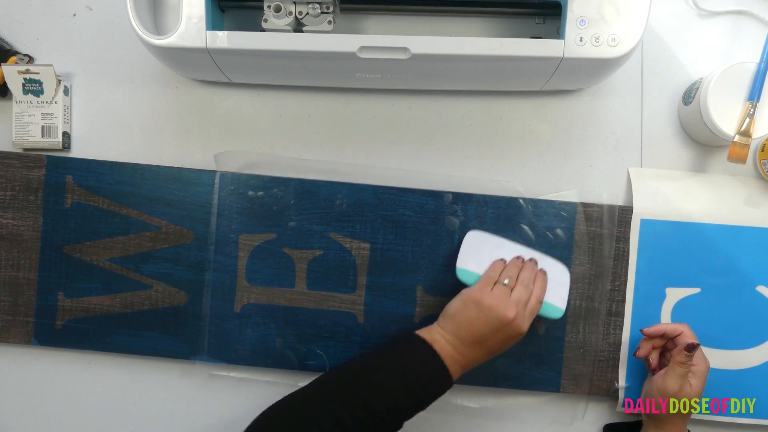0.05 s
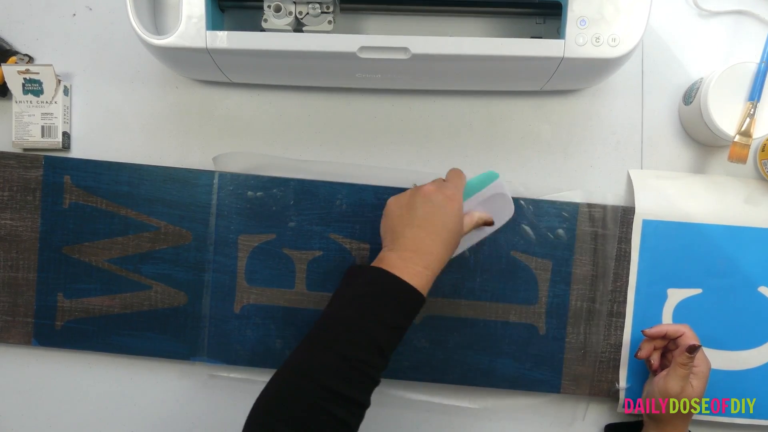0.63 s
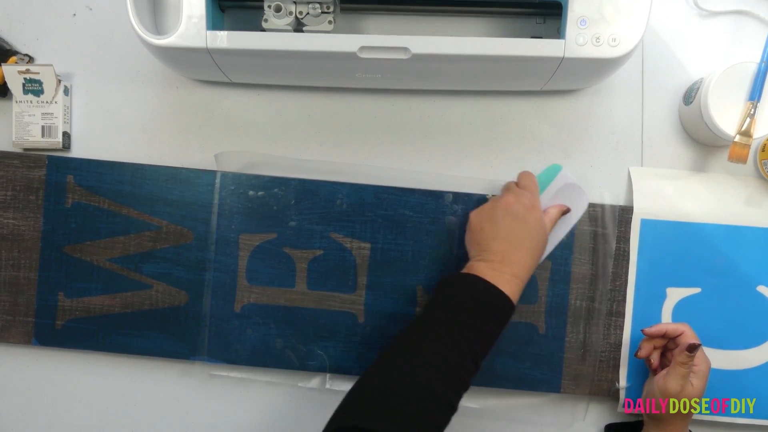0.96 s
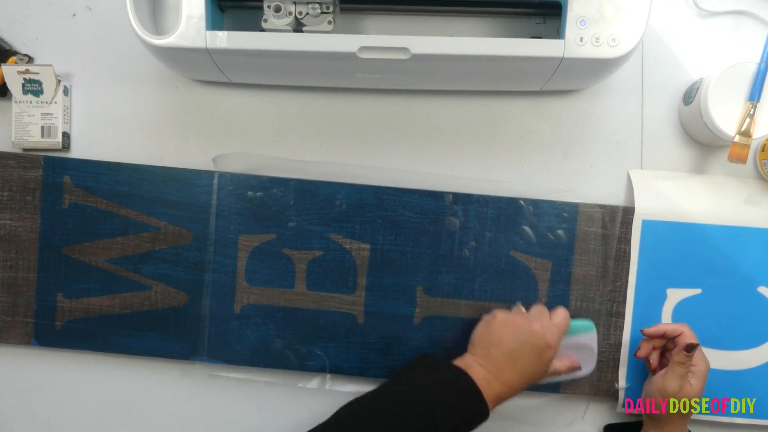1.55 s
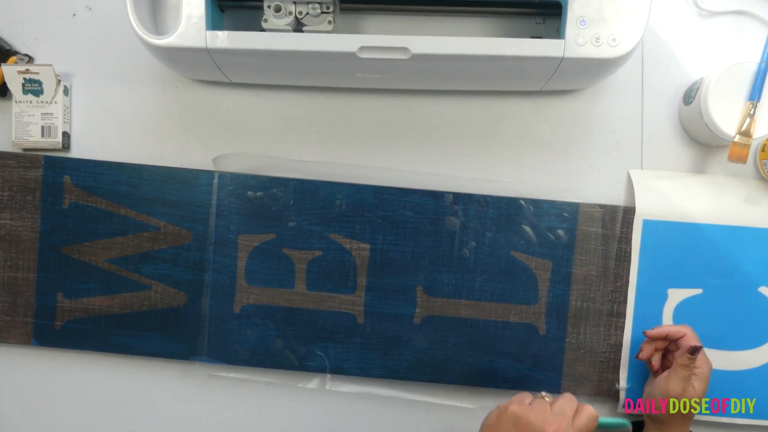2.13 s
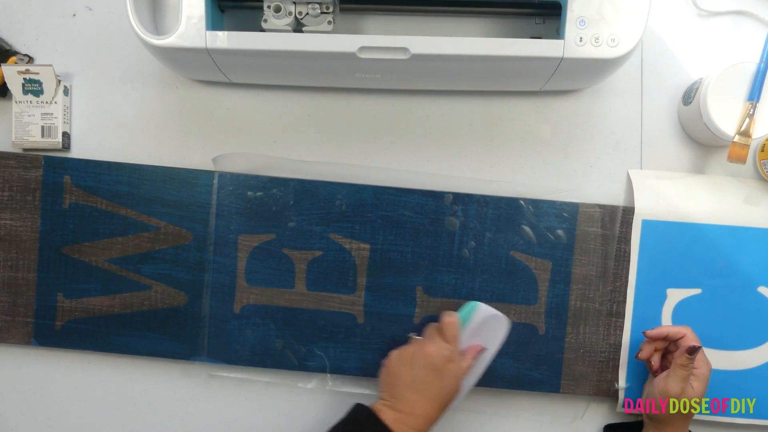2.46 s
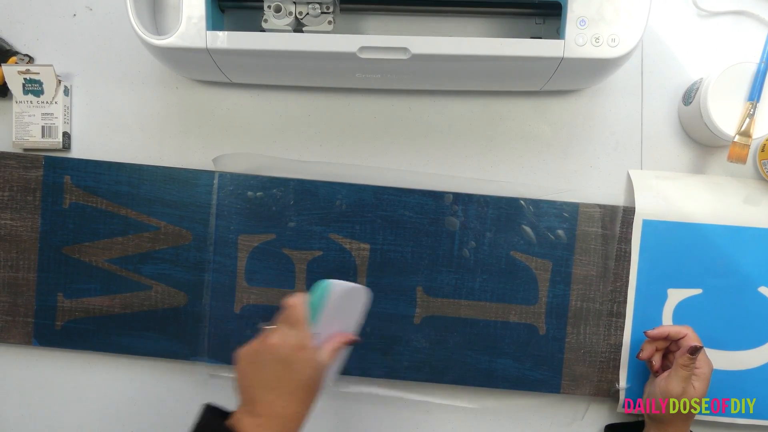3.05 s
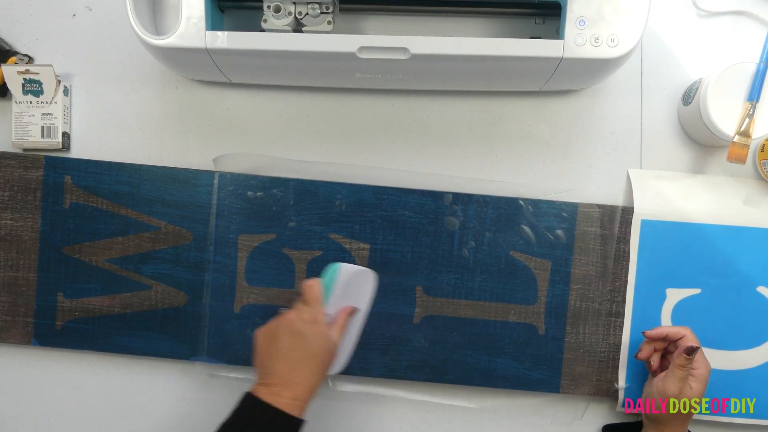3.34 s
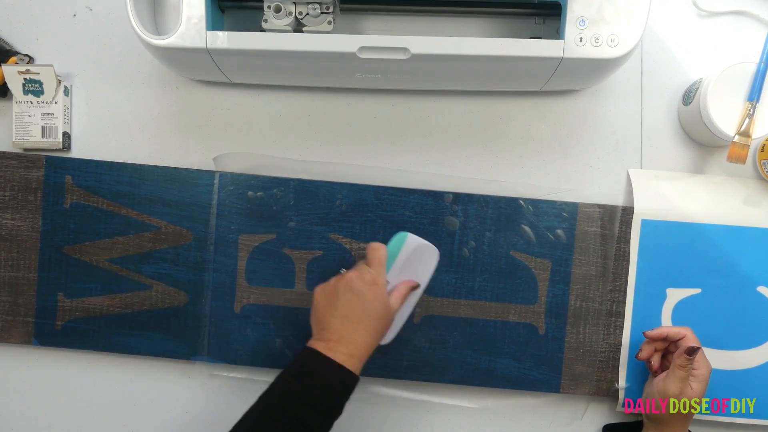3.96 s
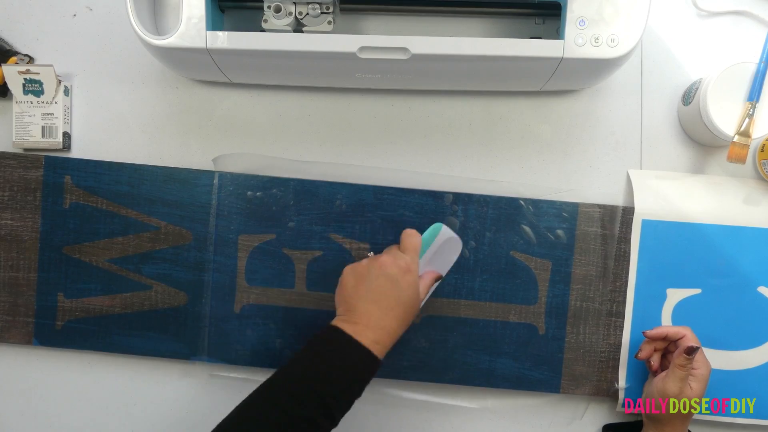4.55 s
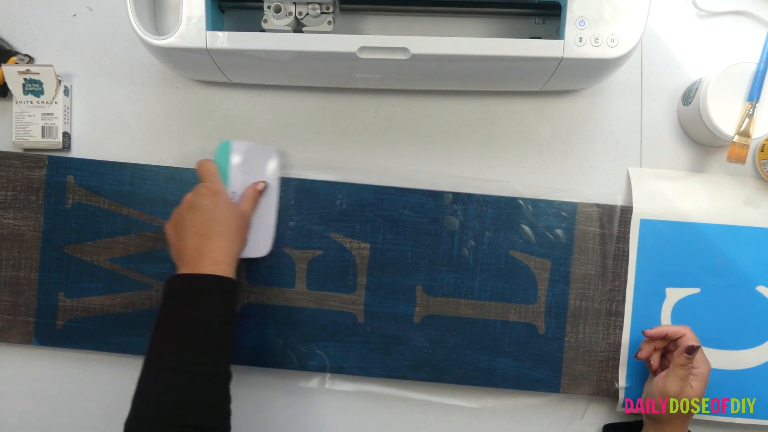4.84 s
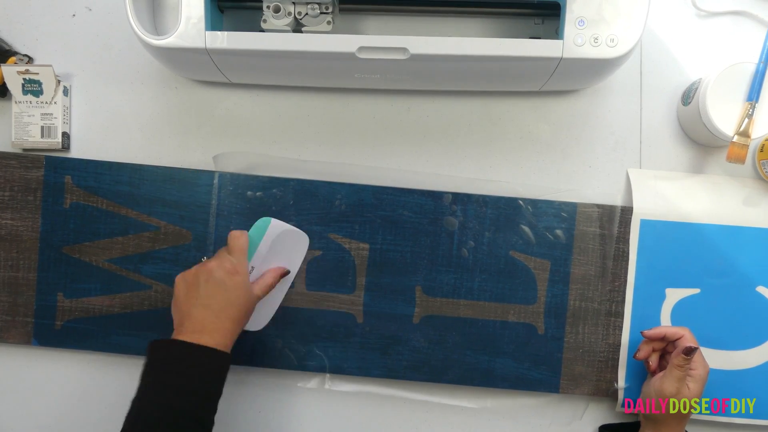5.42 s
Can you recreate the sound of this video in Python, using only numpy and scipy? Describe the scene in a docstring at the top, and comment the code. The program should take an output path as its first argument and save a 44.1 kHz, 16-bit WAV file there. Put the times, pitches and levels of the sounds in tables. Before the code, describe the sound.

Repeated close scraping of a plastic blade over a paper-covered wooden board, with sharp clacks, snags and soft thumps.

```python
"""A plastic scraper burnishes transfer paper onto a wooden board, in nine strokes of one or two pushes.
Each stroke opens with a clack as the blade lands, then swells into a rasp of tiny slips that rings
the blade and rumbles in the board. The edge snags on ridges in the vinyl; the board creaks, and rocks
with soft thumps. Heard close to the craft table in a small room, on a nearly mono stereo microphone."""
import sys
import numpy as np
from scipy import signal
from scipy.fft import rfft, irfft, next_fast_len
from scipy.io import wavfile

SR = 44100
rng = np.random.default_rng(int(sys.argv[2]) if len(sys.argv) > 2 else 0)


def master_out(mix):
    """Clip the mix to full scale and print it as 16-bit PCM to the path in sys.argv[1]."""
    frames = np.transpose(np.atleast_2d(mix))
    ceiling = np.clip(frames, -1, 1)
    pcm = np.round(ceiling * 32767).astype(np.int16)
    wavfile.write(sys.argv[1], SR, pcm)


N = 250929
TIME = np.arange(N) / SR


def from_db(db):
    """Decibels to gain."""
    return 10 ** (np.asarray(db) / 20)


def rms_one(x):
    """Scale to unit power."""
    return x / np.sqrt(np.mean(x ** 2) + 1e-20)


def colour(x, spectrum):
    """Shape a steady signal to (Hz, dB) points, rolling off beyond both ends; unit power."""
    hz, db = np.transpose(spectrum)
    size = next_fast_len(N)
    bins = np.fft.rfftfreq(size, 1 / SR) + 1
    skirts = 1 / (1 + (hz[0] / bins / 2) ** 2) / (1 + (bins / hz[-1] / 2) ** 2)
    gain = skirts * from_db(np.interp(np.log(bins), np.log(hz), db))
    return rms_one(irfft(rfft(x, size) * gain, size)[:N])


def drift(turns_per_s):
    """A random wander of unit power."""
    return rms_one(np.interp(TIME * turns_per_s, np.arange(N // 10), rng.standard_normal(N // 10)))


def decay(start, t60):
    """An envelope that jumps to 1, then falls 60 dB in t60 seconds."""
    age = TIME - start
    return (age >= 0) * from_db(-60 * np.clip(age / t60, 0, 4))


def ring(start, hz, t60):
    """A struck mode: a dying sine."""
    out, first = np.zeros(N), int(start * SR)
    age = TIME[:min(int(2 * t60 * SR), N - first)]
    out[first:first + len(age)] = -np.sin(2 * np.pi * hz * age) * np.exp(-np.log(1000) * age / t60)
    return out


# The quiet of the room around the table. Each row: frequency in Hz, relative level in dB.
AIR_SPECTRUM = [(15, -15), (25, 3), (102, 1), (277, -8.5), (560, -11), (840, -12.5), (1160, -11.5),
                (1940, -15), (2550, -18), (2760, -19), (4250, -21.5), (5000, -23), (14400, -32),
                (16000, -34)]

def room_tone(level_db=-49):
    """Faint, steady air, strongest in the bass."""
    return from_db(level_db) * colour(rng.standard_normal(N), AIR_SPECTRUM)


# The board rocking on the table. Each row: start in seconds, level in dB, middle pitch in Hz,
# length in seconds.
BOARD_THUMPS = [(0.036,-31.5,87,0.063), (0.375,-22,146,0.049), (0.654,-30,84,0.055), (0.938,-30,140,0.042),
                (1.257,-31,81,0.059), (1.846,-31,88,0.049), (2.055,-26.5,203,0.036), (3.598,-36,68.6,0.046),
                (4.644,-27,212,0.035)]

def thumps(rise=0.23):
    """Soft, low knocks whose pitch rises as the board is pressed down."""
    out = np.zeros(N)
    for start, db, hz, length in BOARD_THUMPS:
        progress = np.clip((TIME - start) / length, 0, 1)
        cycles = hz * length * progress * (1 + rise * (progress - 1))
        swell = np.sin(np.pi * progress ** 0.93) ** 2
        out += from_db(db) * swell * np.sin(2 * np.pi * cycles)
    return out


# The blade coming down on the board. Each row: start in seconds, blade ring in dB, its pitch in Hz,
# hollow ring in dB, its pitch in Hz, crack in dB, clatter in dB, its t60 in seconds, board in dB.
BLADE_LANDINGS = [(0.1386, 2.5, 1420, -45, 3440, -11.5, -29, 0.22, -41),
                  (0.7435, -19, 1430, -24.5, 900, -37, -30.5, 0.17, -45.5),
                  (1.3687, -3.5, 1624, -16, 1960, -16, -18, 0.1, -38),
                  (2.0467, -27, 1670, -18.5, 2215, -14, -21.5, 0.21, -37.5),
                  (2.6750, -13, 1130, -25, 3430, -15.5, -27, 0.29, -41.5),
                  (3.1750, -16, 1830, -22.5, 2210, -28, -27, 0.13, -49.5),
                  (3.7046, -32, 1480, -45, 736, -35, -23.5, 0.25, -37.5),
                  (4.6167, -9.5, 1260, -12, 1620, -14, -17, 0.14, -34.5),
                  (5.3308, -31, 1830, -33, 688, -20.5, -22, 0.15, -39)]
# The crack and the clatter of plastic on wood. Each row: frequency in Hz, relative level in dB.
CRACK_SPECTRUM = [(300, -43), (1000, 1), (3300, 17.5), (6000, -4), (9500, 3), (15000, -36)]
CLATTER_SPECTRUM = [(100, -19), (300, -38), (500, -30), (750, -14), (1300, 6.5), (1900, 8), (2200, 0.5),
                    (3500, -1), (5500, -3), (6500, -9), (9500, -14.5), (15000, -42)]
# The wooden board's modes. Each row: frequency in Hz, relative level in dB, t60 in seconds.
WOOD_MODES = [(124.1, 0, 0.52), (160, -8, 0.42), (216.3, -3, 0.75), (250, -9.5, 0.073), (311.3, 1.5, 0.2),
              (414, -30, 0.15), (622, 7.5, 0.052), (725, 12, 0.072), (823, 10, 0.085), (1018, 6, 0.18),
              (1240, 8, 0.02), (1554, 9, 0.24), (1825, 19.5, 0.052), (2860, 9, 0.046), (3720, 8, 0.056)]

def landings(blade_t60=0.013, hollow_t60=0.064, crack_t60=0.019):
    """The hand-damped hollow scraper cracks down, rings and clatters; the board's modes ring on."""
    crack = colour(rng.standard_normal(N), CRACK_SPECTRUM)
    clatter = colour(rng.standard_normal(N), CLATTER_SPECTRUM)
    out = np.zeros(N)
    for (start, blade_db, blade_hz, hollow_db, hollow_hz,
         crack_db, clatter_db, clatter_t60, board_db) in BLADE_LANDINGS:
        out += from_db(blade_db) * ring(start, blade_hz, blade_t60)
        out += from_db(hollow_db) * ring(start, hollow_hz, hollow_t60)
        out += from_db(crack_db) * decay(start, crack_t60) * crack
        out += from_db(clatter_db) * decay(start, clatter_t60) * clatter
        for hz, db, t60 in WOOD_MODES:   # each landing place favours other modes
            gain = from_db(board_db + db + rng.normal(0, 1.7)) * rng.choice([-1, 1])
            out += gain * ring(start, hz, t60)
    return out


def shudders(rumble, relative_db=-1, t60=0.59):
    """The board rumbles on under each landing."""
    return rumble * sum(from_db(board_db + relative_db) * decay(start, t60)
                        for start, *_, board_db in BLADE_LANDINGS)


# The scraper's pushes across the paper. Each row: start and length in seconds; rasp, paper hiss,
# board ring and rumble in dB; point of hardest press (0-1 of the push); blade ring in dB, point where
# it bites best (0-1), ring lost a whole push away from there in dB; light drag afterwards in dB;
# blade pitch at the start and at the end in Hz.
PUSHES = [ (0.167, 0.28, -29, -39.5, -46.5, -39.5, 0.66, -23.5, 0.47, 104, -42, 1185, 1290),
          (0.776, 0.25, -27.5, -38, -39, -41, 0.75, -27, 0.52, 46, -41.5, 1200, 1230),
          (1.379, 0.24, -27, -38, -39, -35.5, 0.94, -28.5, 0.77, 14, -41, 1270, 1220),
          (2.136, 0.17, -37, -49, -66, -55, 0.43, -40, 0.7, 22, -75, 1760, 1740),
          (2.269, 0.32, -34, -45.5, -57, -42, 0.11, -31.5, 0.31, 46, -78, 1430, 1560),
          (2.745, 0.24, -25.5, -35, -44, -41, .75, -18.5, 0.77, 82, -55, 1450, 1464),
          (3.056, 0.038, -31, -38.5, -50, -48, 0.98, -35.5, 1, 40, -75, 1460, 1440),
          (3.168, 0.031, -32, -39, -43, -39.5, 0.96, -29.5, .85, 13, -70, 1630, 1540),
          (3.239, 0.21, -27, -36.5, -41, -37, 0.54, -16.5, 0.55, 73, -53.5, 1560, 1330),
          (3.785, .49, -29, -39, -38.5, -41, 0.61, -22.5, 0.5, 53, -56.5, 1444, 1680),
          (4.654, 0.34, -25.5, -35, -31.5, -53, 0.75, -21.5, 0.58, 79, -47.5, 1520, 1450),
          (5.361, 0.28, -24, -33.5, -33, -37, 0.92, -21, 0.85, 51, -49, 1480, 1460)]

def push_gains(attack_s=0.056, press_arch_db=20, rumble_arch_db=68, rumble_lag=0.23):
    """Each push speeds up, presses in an arch and stops; the blade drags lightly on the way back."""
    stop_db_per_s, settle_db_per_s, drag_db_per_s = 260, 140, 41
    rasp, hiss, blade, wood, rumble, drag = np.zeros((6, N))
    for (start, length, rasp_db, hiss_db, wood_db, rumble_db, press_at,
         ring_db, bite_at, ring_loss_db, drag_db, _, _) in PUSHES:
        age = np.maximum(TIME - start, 0)
        progress, after = np.minimum(age / length, 1), np.maximum(age - length, 0)
        attack = np.minimum(age / min(attack_s, length), 1)
        speed = attack * from_db(-stop_db_per_s * after)
        press_db = -press_arch_db * (progress - press_at) ** 2
        rasp += speed * from_db(rasp_db + press_db)
        wood += speed * from_db(wood_db + press_db)
        hiss += speed ** 0.98 * from_db(hiss_db + 0.87 * press_db)
        blade += speed * from_db(ring_db - ring_loss_db * (progress - bite_at) ** 2)
        # the rumble peaks after the hardest press and settles more slowly
        late_press_db = -rumble_arch_db * (progress - press_at - rumble_lag) ** 2
        rumble += attack * from_db(rumble_db + late_press_db - settle_db_per_s * after)
        drag += progress * from_db(drag_db - drag_db_per_s * after)
    drag *= from_db(-0.5 * drift(turns_per_s=95))
    # the drag adds its power to everything but the hiss
    rasp = np.hypot(rasp, from_db(-6.5) * drag)
    blade = np.hypot(blade, from_db(-3.5) * drag)
    wood = np.hypot(wood, from_db(-11) * drag)
    rumble = np.hypot(rumble, from_db(1) * drag)
    return rasp, hiss, blade, wood, rumble


def blade_pitch():
    """The blade's resonance glides through each push as grip and angle change."""
    points = [point for start, length, *_, first_hz, last_hz in PUSHES
              for point in ((start, first_hz), (start + length, last_hz))]
    return np.interp(TIME, *np.transpose(points))


def friction(slips_per_s, spread_db, judder_db, judder_per_s, smooth=1.0):
    """Countless tiny, uneven slips over a smooth sliding hiss; both flutter as the edge judders."""
    sizes = from_db(spread_db * np.minimum(rng.exponential(1, N), 5)) * rng.choice([-1, 1], N)
    slips = rms_one(sizes * (rng.random(N) < slips_per_s / SR))
    sliding = smooth * rng.standard_normal(N)
    return rms_one((slips + sliding) * from_db(judder_db * drift(judder_per_s)))


# The plastic blade's modes. Each row: multiple of its pitch, width in Hz, relative level in dB.
PLASTIC_MODES = [(.87, 330, -10), (1.01, 210, 0), (1.13, 200, -7)]

def blade_ring(blade_hz):
    """The edge's stick and slip drives the blade's modes, which shift together with the grip."""
    out = np.zeros(N)
    for multiple, width_hz, db in PLASTIC_MODES:
        force = friction(slips_per_s=5000, spread_db=2, judder_db=1.3, judder_per_s=110)
        hz = multiple * blade_hz
        mode = resonate(resonate(force, hz, width_hz), hz, 2 * width_hz)
        out += from_db(db) * rms_one(mode)
    return rms_one(out)


def resonate(x, hz, width_hz, block=256):
    """A resonance of gain 1 whose centre follows a curve."""
    radius = np.exp(-np.pi * width_hz / SR)
    zeros = np.array([1, 0, -1]) * (1 - radius ** 2) / 2
    out, state = np.zeros(N), np.zeros(2)
    for i in range(0, N, block):
        poles = [1, -2 * radius * np.cos(2 * np.pi * hz[i] / SR), radius ** 2]
        out[i:i + block], state = signal.lfilter(zeros, poles, x[i:i + block], zi=state)
    return out


def board_ring(force):
    """The board's modes under a continuous force; the longer a mode rings, the sharper its peak."""
    out = np.zeros(N)
    for hz, db, t60 in WOOD_MODES:
        out += from_db(db) * signal.lfilter(*signal.iirpeak(hz, Q=hz * t60 / 1.4, fs=SR), force)
    return rms_one(out)


def board_bounce(x, delay_s=0.001077, sway=0.31, share=0.42):
    """The delay of the reflection off the board wanders, sweeping a comb through the rasp."""
    lag = delay_s * np.exp(sway * drift(turns_per_s=7))
    return rms_one(x + share * np.interp(TIME - lag, TIME, x))


def catches(per_s=8.3, size=0.63, t60=0.028):
    """A gain that jumps whenever the edge catches a little, and dies back."""
    jumps = (rng.random(N) < per_s / SR) * rng.random(N)
    feedback = from_db(-60 / (t60 * SR))
    return 1 + size * signal.lfilter([1], [1, -feedback], jumps + 1e-18)


# The edge's rasp, the paper's hiss and the board's rumble, heard close by.
# Each row: frequency in Hz, relative level in dB.
RASP_SPECTRUM = [(300, -8.5), (550, -4.5), (730, -1.5), (1000, 2.5), (1700, 0), (2200, 3.6), (2600, 1.5),
                 (3400, 2.56), (4300, -0.5), (5600, -2.5), (6100, -8), (7000, -11), (10000, -25.5)]
HISS_SPECTRUM = [(4500, -11.5), (6300, -7), (7800, -0.5), (9600, -3.5), (11000, -11), (13000, -15.5),
                 (15500, -34)]
RUMBLE_SPECTRUM = [(30, 6), (60, 7.5), (130, 8), (220, 5), (320, 5), (500, -1.5), (700, 2.5), (1100, -0.5),
                   (2000, -42)]

def rubbing():
    """Friction rasps in the paper, rings the blade and shakes the board."""
    rasp_gain, hiss_gain, blade_gain, wood_gain, rumble_gain = push_gains()
    blade = blade_ring(blade_pitch())
    force = friction(slips_per_s=4500, spread_db=1.5, judder_db=1, judder_per_s=260)
    rasp = board_bounce(colour(force, RASP_SPECTRUM))
    fine_slips = friction(slips_per_s=6400, spread_db=-1, judder_db=0, judder_per_s=160)
    hiss = colour(fine_slips, HISS_SPECTRUM)
    coarse_slips = friction(slips_per_s=900, spread_db=1.5, judder_db=3, judder_per_s=56, smooth=0.37)
    rumble = colour(coarse_slips, RUMBLE_SPECTRUM)
    edge = catches() * (rasp_gain * rasp + blade_gain * blade + hiss_gain * hiss)
    board = wood_gain * board_ring(force) + rumble_gain * rumble + shudders(rumble)
    return edge + board + snags(rasp, blade, hiss)


# The edge meeting ridges in the vinyl. Each row: start in seconds, rasp in dB, blade ring in dB,
# paper hiss in dB, t60 in seconds.
RIDGE_SNAGS = [(0.359, -26, -42, -36, 0.064), (0.378, -36, -17, -50, 0.031),
               (0.552, -40.5, -39, -46, 0.033), (0.582, -43, -67, -52, 0.098),
               (0.7365, -29.5, -28.5, -53, 0.087), (1.162, -35.5, -47, -49, 0.052),
               (1.5961, -18, -22, -53, 0.022), (1.722, -39, -55, -50, 0.092), (1.794, -35, -40, -50, 0.04),
               (2.193, -42, -41, -55, 0.045), (2.551, -35, -46, -44, 0.13), (2.8546, -39, -20, -54, 0.056),
               (2.928, -27, -21, -52, .08), (3.455, -27.5, -34, -39, 0.056), (4.2294, -15, -8, -41, 0.013),
               (4.241, -10.5, -19, -16, 0.028), (4.2596, -21, -22, -29, 0.069),
               (4.806, -32, -19, -54, 0.05), (4.9481, -12.5, -12, -28, 0.053),
               (4.965, -22, -33, -29, 0.097), (5.195, -37, -63, -52, 0.041), (5.501, -22.5, -20, -54, 0.06),
               (5.641, -17, -32, -25, 0.077), (5.660, -24, -46, -22.5, .14)]

def snags(rasp, blade, hiss):
    """The edge catches hard on a ridge and the friction surges briefly."""
    out = np.zeros(N)
    for start, rasp_db, blade_db, hiss_db, t60 in RIDGE_SNAGS:
        surge = from_db(rasp_db) * rasp + from_db(blade_db) * blade + from_db(hiss_db) * hiss
        out += decay(start, t60) * surge
    return out


# Small creaks around the early strokes. Each row: start in seconds, level in dB, pitch in Hz.
RELEASE_CREAKS = [(1.009,-22,980), (1.092,-32,284), (1.128,-30,433), (1.179,-31.5,720), (1.244,-39,600),
                  (1.629,-30,830), (1.674,-23,255), (1.719,-33,620), (1.793,-32,710), (1.946,-41,1880)]

def creaks(t60=0.047):
    """Board and scraper tick as the pressure comes off: one local ring within a dull burst."""
    dull = from_db(-15) * colour(rng.standard_normal(N), RUMBLE_SPECTRUM)
    return sum(from_db(db) * (ring(start, hz, t60) + dull * decay(start, t60))
               for start, db, hz in RELEASE_CREAKS)


def room(x, wet_db, t60=0.18, gap_s=0.002, top_hz=9000):
    """The direct sound, then dense reflections off the table and the near walls."""
    age = TIME[:SR // 2]
    tail = rng.standard_normal(len(age)) * (age > gap_s) * from_db(-60 * age / t60)
    tail = signal.sosfilt(signal.butter(1, top_hz, fs=SR, output="sos"), tail)
    return x + from_db(wet_db) * signal.fftconvolve(x, tail / np.linalg.norm(tail))[:N]


# Stereo width at the microphone. Each row: frequency in Hz, typical side level against mid in dB.
SIDE_SPECTRUM = [(60, -27), (200, -26), (400, -23), (750, -24), (1400, -29), (2600, -23), (5500, -21),
                 (10000, -19)]

def capsules(x, scatter_points=160, sway_db=7):
    """Two capsules side by side hear nearly the same; scattered sound sets them apart in phase."""
    size = next_fast_len(N)
    bins = np.fft.rfftfreq(size, 1 / SR) + 1
    hz, db = np.transpose(SIDE_SPECTRUM)
    scatter_hz = np.linspace(0, SR / 2, scatter_points)
    scatter = rms_one(np.interp(bins, scatter_hz, rng.standard_normal(scatter_points)))
    side_gain = 1j * scatter * from_db(np.interp(np.log(bins), np.log(hz), db))
    side = irfft(rfft(x, size) * side_gain, size)[:N]
    sway = rms_one(from_db(sway_db * drift(turns_per_s=9)))   # the stereo width wavers at random
    return x + side * sway * [[1], [-1]]


def scene():
    """Scraper and board close to the microphone, over the quiet air of the room."""
    air, air_side = room_tone(), from_db(-24) * room_tone()
    mic_hiss = from_db(-64.5) * rng.standard_normal((2, N))
    work = room(rubbing() + creaks(), wet_db=-14.5) + room(landings(), wet_db=-22) + thumps()
    return capsules(work + air) + air_side * [[1], [-1]] + mic_hiss


def record(dry):
    """The microphone has one narrow notch; the hardest clack overloads; the top is cut."""
    notch_hz, notch_width_hz, cutoff_hz = 6130, 79, 15900
    notched = signal.lfilter(*signal.iirnotch(notch_hz, notch_hz / notch_width_hz, fs=SR), dry)
    top_cut = signal.ellip(10, 0.1, 100, cutoff_hz, fs=SR, output="sos")
    return signal.sosfilt(top_cut, np.clip(notched, -1, 1))


dry = scene()
out = record(dry)
master_out(out)
```